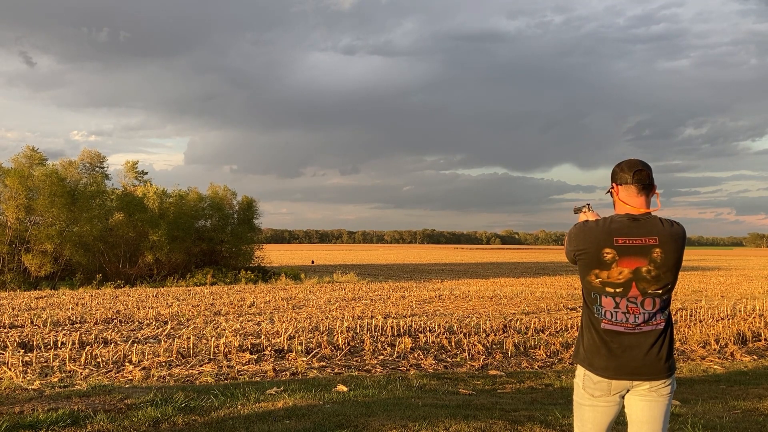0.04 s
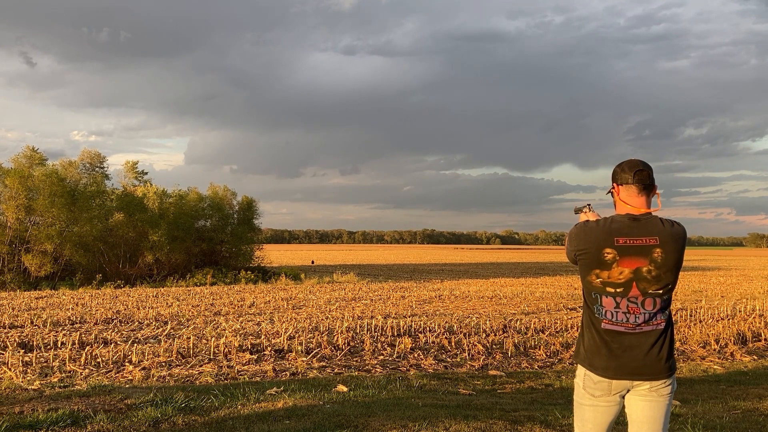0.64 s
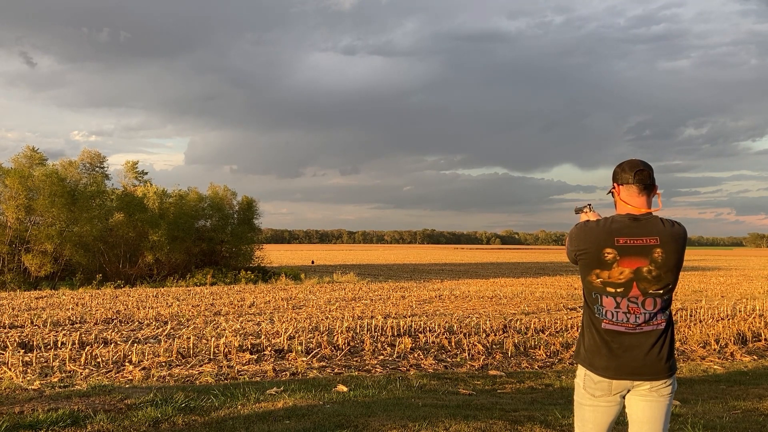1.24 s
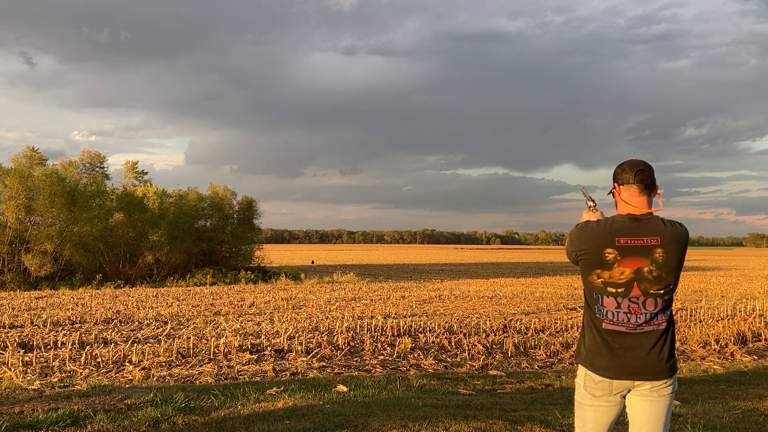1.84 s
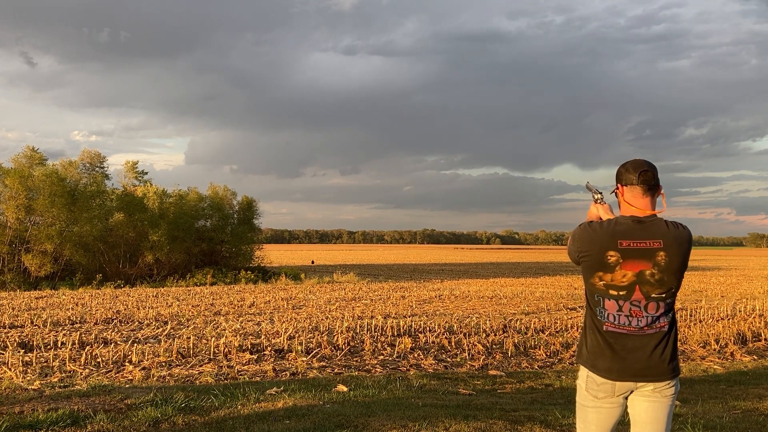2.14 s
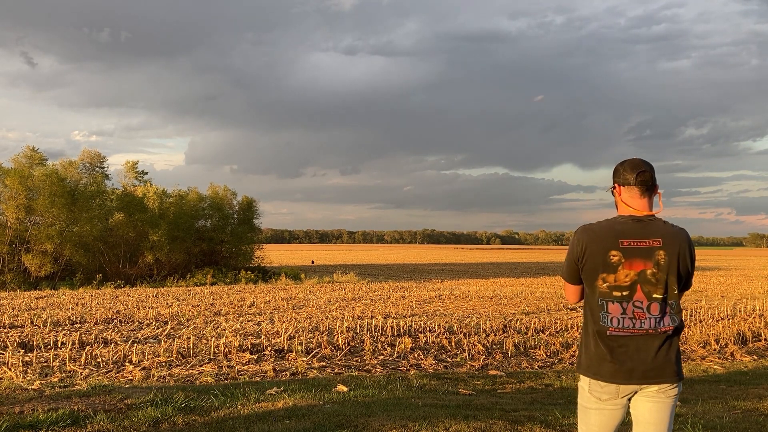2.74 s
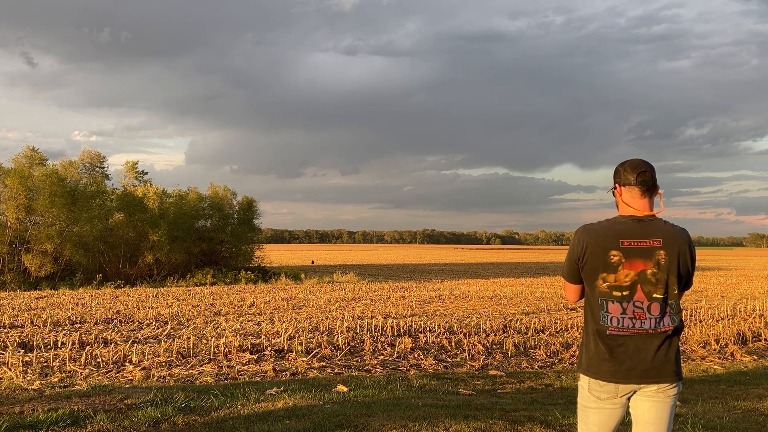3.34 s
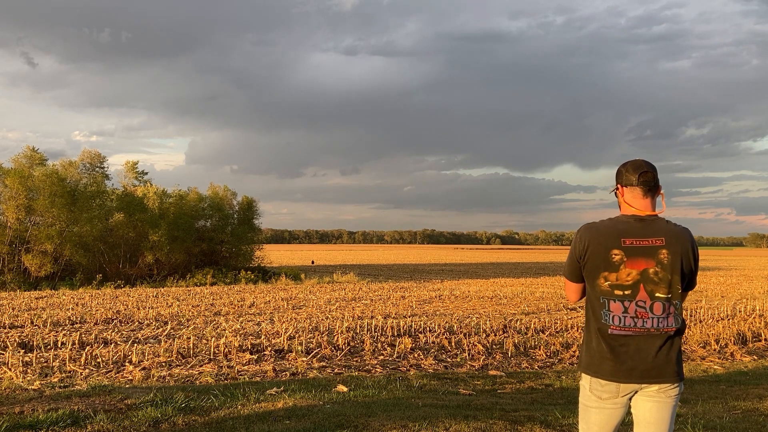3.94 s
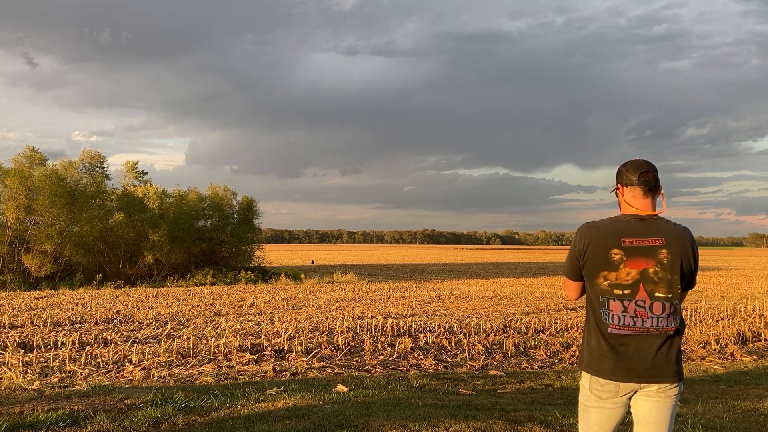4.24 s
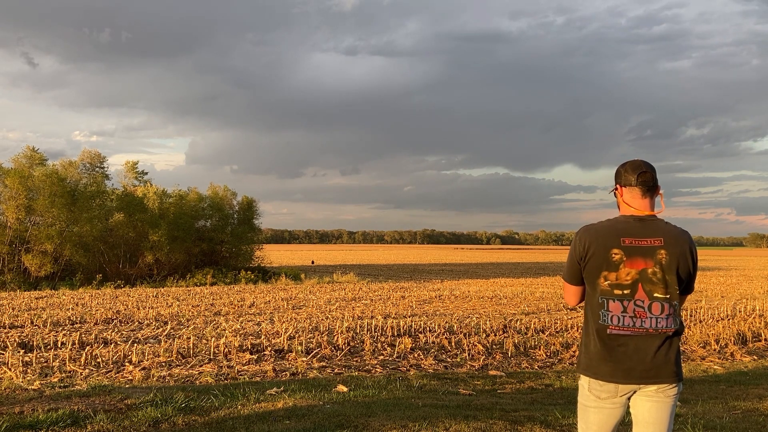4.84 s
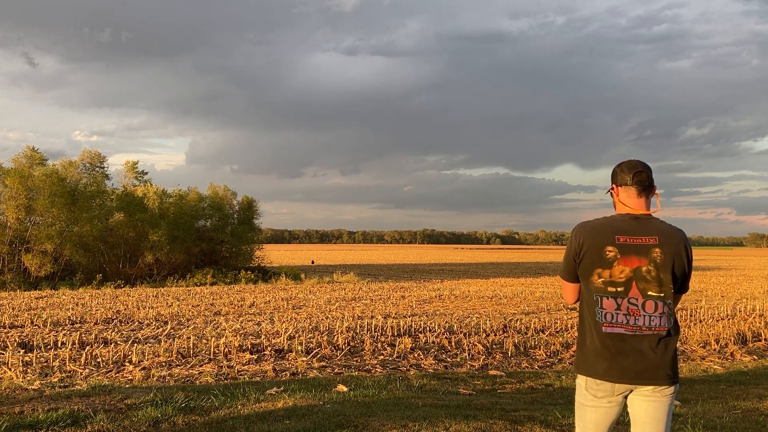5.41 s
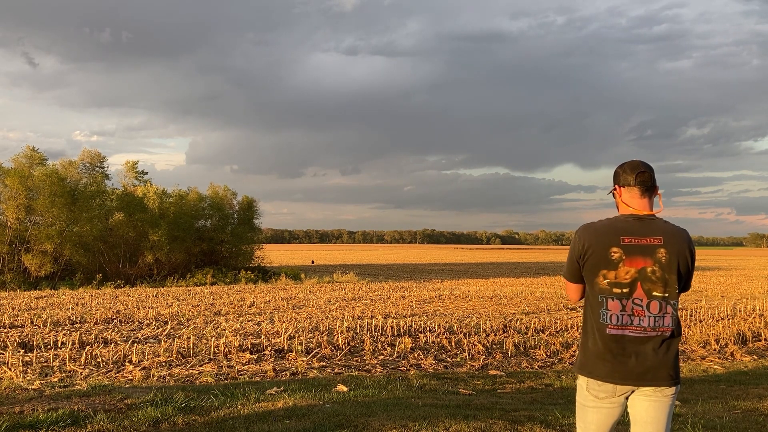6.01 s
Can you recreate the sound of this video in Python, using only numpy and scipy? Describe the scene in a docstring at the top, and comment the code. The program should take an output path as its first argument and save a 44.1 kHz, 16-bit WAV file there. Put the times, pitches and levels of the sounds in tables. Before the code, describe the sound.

A revolver fires once, close to the microphone, over a soft bed of chirping crickets in a wide field. The distorted bang rolls off the trees, and a bright metallic clang comes back from a far steel target less than a second later. As the ring dies away, faint insects remain, with one light click of the gun being handled and slight wind rumble near the end.

```python
"""Crickets and a katydid rub their wings in a harvested field while a far vehicle hums past.
At 1.8 s, just after a brief, harsh swell of recording noise, a revolver fires and overloads the
microphone. Nearby trees throw back sharp claps, then the far tree line dull ones. At 2.6 s comes
the clang of the bullet on a distant steel plate. At 4.6 s the gun clicks as it is handled.
Last, a little wind bumps the microphone and the insects grow slightly louder."""
import sys
import numpy as np
from scipy import signal
from scipy.fft import rfft, irfft, next_fast_len
from scipy.io import wavfile

SR = 44100
rng = np.random.default_rng(int(sys.argv[2]) if len(sys.argv) > 2 else 0)


def transcribe(u):
    """Save the signal u as a 16-bit wav file named by the first command-line argument.

    u: samples, shape (n,) or (channels, n), limited to [-1, 1]; the rate is SR.
    q: integer samples, one column per channel.
    """
    v = np.clip(np.atleast_2d(u).T, -1, 1)
    q = np.round(v * 32767).astype(np.int16)
    wavfile.write(sys.argv[1], SR, q)


N = 267687

# Hush of the open air: frequency_hz, level_db
AIR_SPECTRUM = [(20, -5.5), (70, -0.5), (130, -7.5), (280, -18), (560, -14.5), (700, -18.5), (1000, -24),
                (1500, -27), (2000, -22), (4000, -45)]
# Small gusts that thud on the microphone: time_s, level_db
GUSTS = [(1.543, -49.5), (5.025, -49.5), (5.079, -45.5), (5.345, -40.5), (5.514, -44)]
# Longer spells of breeze: start_s, rise_s, hold_s, level_db
BREEZES = [(1.45, .3, .05, -61.5), (4.98, 0.11, 0.51, -57)]
# Many far insects blurred together: frequency_hz, level_db
CHORUS_SPECTRUM = [(2000, -33.5), (2800, -20), (3500, -7), (4200, -4.5), (4700, 3), (5300, -3), (5800, -9),
                   (7800, -9), (9000, -15.5), (11500, -13), (15500, -16)]
# Insects that trill without a break: pitch_hz, strokes_per_s, pitch_fall_share, level_vs_chorus_db
TRILLS = [(7390, 25.5, .025, -13), (4590, 44.3, .01, -12), (4215, 79, .02, -12.5)]
# The katydid's high buzz: frequency_hz, level_db
KATYDID_SPECTRUM = [(5000, -42.5), (8000, -15.5), (10200, -4), (11200, -3), (12200, -3), (13500, -14),
                    (15500, -14)]
# Runs of cricket chirps: start_s, end_s, period_s, pitch_hz, level_vs_chorus_db
CHIRP_RUNS = [(.125, 1.5, .39, 4786, -3.5), (.512, 1.7, 0.47, 4150, -9.5), (3.215, 6, .425, 4800, -4),
              (3.93, 6, 0.54, 4130, -8)]
# Steel parts of the gun clicking: start_s, level_db, pitch_hz, width_hz
GUN_CLICKS = [(4.5973, -46, 2600, 700), (4.6014, -49, 1490, 200), (4.6012, -34, 7300, 1200)]
# The plate's strong ringing tones: pitch_hz, level_db, fade_s (a fade is the time to drop 60 dB)
PLATE_TONES = [(467.5, -56.0, 3.0), (898.0, -40.0, 0.55), (1185.3, -34.0, 0.98), (1396.6, -21.5, 0.5),
               (1486.7, -25.0, 0.98), (1902.4, -35.5, 0.5), (2261.0, -40.0, 0.45), (2482.0, -32.5, 0.44),
               (2880.0, -43.0, 0.45), (3308.5, -35.5, 0.46), (3488.0, -45.0, 0.5), (4060.0, -45.0, 0.95),
               (4544.0, -44.0, 0.6), (6282.0, -38.0, 0.45), (6852.2, -33.0, 0.64), (7693.0, -44.0, 0.46),
               (7940.0, -45.0, 0.5), (8753.0, -37.0, 0.33), (10960.0, -42.0, 0.35)]
# Strength of the plate's many weak tones: frequency_hz, level_db
WEAK_TONE_SPECTRUM = [(700, -12), (1500, -1.5), (4000, -2.5), (5600, -12), (8000, -9), (11000, -9.5),
                      (13500, -32)]
# How much of the clang the near trees send back: frequency_hz, gain_db
CLANG_ECHO_GAINS = [(1500, -32), (1900, -3), (2450, -16), (3350, -13), (4050, -6), (6900, -13), (9000, -16)]
# Land that scatters the shot (stubble, near trees, tree line, farther trees):
# start_s, hold_s, fade_s, bright_db, dull_db
LAND_PATCHES = [(1.808, 0.022, 0.13, -24, -34), (1.946, 0.17, 0.38, -36.5, -44.5),
                (2.165, 0.052, 0.79, -40, -35.5), (2.412, 0.054, 0.2, -51, -39.5)]
# The bright part of that scattered sound: frequency_hz, level_db
BRIGHT_SPECTRUM = [(60, -9), (200, -4.5), (430, -11), (1000, 5), (1600, -2.5), (3300, -6.5), (5000, -12),
                   (8000, -17.5), (14000, -31)]
# The dull part of that scattered sound: frequency_hz, level_db
DULL_SPECTRUM = [(60, -23), (200, -20), (380, -7), (900, -2), (1800, -7.5), (8000, -45.5)]
# The shot's thump, returned softly by the near trees: time_s, level_db
ECHO_THUDS = [(2.033, -35), (2.112, -36)]
# Sharp echoes off the near trees: start_s, level_db, low_hz, high_hz
NEAR_ECHOES = [(1.8404, -12.5, 1300, 3230), (1.9686, -12, 550, 5730), (1.9718, -17, 600, 2590),
               (2.0122, -14.5, 1000, 4470), (2.0367, -12, 1590, 3870), (2.0708, -20.5, 2200, 7940),
               (2.0925, -11, 1500, 4500), (2.1125, -18, 900, 3400), (2.159, -23.5, 900, 3200)]
# Dull echoes off the far trees: start_s, level_db, centre_hz, crisp_edge_db
FAR_ECHOES = [(2.1827, -21, 795, -9), (2.1948, -21, 900, -16), (2.202, -16.5, 840, -11),
              (2.2355, -17.5, 740, -14), (2.2476, -22, 680, -22), (2.2546, -20.5, 880, -16),
              (2.2653, -19.5, 820, -16), (2.268, -19.5, 810, -22), (2.316, -23.5, 850, -20),
              (2.363, -25, 630, -21), (2.403, -27, 680, -26), (2.4342, -23, 490, -26),
              (2.4673, -21, 704, -22), (2.478, -21.5, 576, -24), (2.5592, -33.5, 750, -8),
              (3.144, -39, 780, 0.5), (3.697, -58, 700, -14)]
# The swell of recording noise just before the shot: frequency_hz, level_db
RECORDING_NOISE_SPECTRUM = [(60, -5.5), (200, 0.5), (600, -8.5), (1500, -14), (3500, -20), (6400, -25),
                            (7600, -20), (8500, -32), (16000, -42)]
# Harsh tones ringing in that noise: pitch_hz, level_db
RECORDING_NOISE_TONES = [(683, 0), (797, -3), (966, -1), (1144, -5), (1290, -2), (1818, -11), (2058, -11),
                         (2705, -13), (7155, -15), (7501, -14)]
# Which side that noise leans to: frequency_hz, left_minus_right_db
RECORDING_NOISE_PAN = [(380, 6), (700, -13.5), (1290, -23), (2400, -5.5), (8000, -2.5)]

TIME = np.arange(N) / SR
SHOT_S, CLANG_S = 1.8135, 2.569
CHORUS_DB = -64.5
FIELD_LAG_MS = -.272   # sound from the field reaches the left side slightly first


def amp(db):
    """Turn decibels into a number to multiply by."""
    return np.exp(np.maximum(db, -300) * (np.log(10) / 20))


def unit_power(x):
    """Scale a sound so that its average power is one."""
    return x / np.sqrt(np.mean(x ** 2) + 1e-20)


def spectrum(points):
    """Join (frequency, dB) points into a curve with a value for every FFT frequency."""
    hz, db = np.transpose(points)
    return np.interp(np.log(np.fft.rfftfreq(N, 1 / SR) + 1), np.log(hz), db)


def equalise(x, gains_db):
    """Turn each frequency up or down by its own amount."""
    size = next_fast_len(N, True)
    gains = np.interp(np.fft.rfftfreq(size), np.fft.rfftfreq(N), amp(gains_db))
    return irfft(rfft(x, size) * gains, size)[..., :N]


def band(x, low_hz, high_hz, order=2):
    """Keep the frequencies between two limits."""
    limits = [low_hz, min(high_hz, .45 * SR)]
    return signal.sosfilt(signal.butter(order, limits, "band", fs=SR, output="sos"), x)


def place(x, pan_db, lag_ms):
    """Make stereo: the left side is louder by pan_db and later by lag_ms."""
    t = np.arange(len(x)) / SR
    left = np.interp(t - lag_ms / 1000, t, x)
    return np.array([left * amp(pan_db / 2), x * amp(-pan_db / 2)])


def noise(points, alike=0., lag_ms=0.):
    """Stereo noise with a given spectrum; alike (0 to 1) is the share both sides have in common."""
    shared, *own = rng.standard_normal((3, N))
    white = np.sqrt(alike) * place(shared, 0, lag_ms) + np.sqrt(1 - alike) * np.array(own)
    return unit_power(equalise(white, spectrum(points)))


def drift(rate_hz, size=N):
    """A smooth random wobble, about one in size."""
    smooth = signal.butter(2, rate_hz, fs=SR, output="sos")
    return unit_power(signal.sosfilt(smooth, rng.standard_normal(size + SR // 4))[-size:])


def tone(hz, waver):
    """A pure tone whose pitch wanders by a small share."""
    return unit_power(np.sin(2 * np.pi * np.cumsum(hz * (1 + waver * drift(25))) / SR))


def dying(start_s, fade_s):
    """A loudness curve that jumps to one and dies away."""
    return (TIME >= start_s) * amp(-60 * np.maximum(TIME - start_s, 0) / fade_s)


def swell(start_s, rise_s, hold_s, fade_s):
    """A loudness curve that grows to one, holds and dies away."""
    rise = np.clip((TIME - start_s) / rise_s, 0, 1) ** 2
    return rise * amp(-60 * np.maximum(TIME - start_s - rise_s - hold_s, 0) / fade_s)


def bumps(rows, half_width_s):
    """A loudness curve with one short hump for each (time, dB) row."""
    return sum(amp(db) * np.exp(-.5 * ((TIME - s) / half_width_s) ** 2) for s, db in rows)


def clap(low_hz, high_hz, tail, fade_s, order=3):
    """A pressure spike with a noisy tail, kept to one band and scaled to a peak of one."""
    t = np.arange(SR // 16) / SR
    spike = tail * rng.standard_normal(len(t)) * amp(-60 * t / fade_s)
    spike[0] += 1
    x = band(spike, low_hz, high_hz, order)
    return x / np.abs(x).max()


def add(out, start_s, x):
    """Mix a sound in at a given time."""
    at = int(start_s * SR)
    out[..., at:at + x.shape[-1]] += x[..., :N - at]


def far_vehicle(level_db=-80.5, nearest_s=.65, fade_db_per_s=15):
    """Far tyres hum, loudest as the vehicle passes."""
    return amp(level_db - fade_db_per_s * np.abs(TIME - nearest_s)) * tone(567, waver=.0061)


def open_air():
    """A low hush, plus a higher one that sounds wide because its two sides are opposite."""
    wide = noise([(250, -25), (550, .5), (1000, -2.5), (2600, -12.5), (5000, -35)], alike=1) * [[1], [-1]]
    return amp(-70) * noise(AIR_SPECTRUM, alike=.54, lag_ms=FIELD_LAG_MS) + amp(-76.5) * wide


def wind():
    """Breeze and small gusts push on the microphone and make it rumble."""
    breeze = sum(amp(db) * swell(s, rise_s, hold_s, fade_s=.4) for s, rise_s, hold_s, db in BREEZES)
    rumble = noise([(20, .5), (55, 1.5), (100, -3), (170, -19.5), (300, -40.5), (4000, -90)], alike=.41)
    return (bumps(GUSTS, half_width_s=.015) + breeze) * rumble


def wing_strokes(strokes, hz, fall, rasp):
    """Each closing of the wings is a short tone that sags in pitch; strokes counts up over time."""
    progress = strokes % 1
    note = np.exp(2j * np.pi * np.cumsum(hz * (1 - fall * (progress - .5))) / SR)
    roughness = drift(170, len(strokes)) + 1j * drift(170, len(strokes))
    return unit_power(np.sin(np.pi * progress) ** 4 * np.real(note * (1 + rasp * roughness)))


def insect_chorus(join_s=5.07, join_rise_s=.71, lisp_period_s=.36):
    """A blur of far insects, steady trills and a slow lisping call; more insects join near the end."""
    lift = amp(3 * np.clip((TIME - join_s) / join_rise_s, 0, 1))
    out = np.sqrt(lift) * noise(CHORUS_SPECTRUM, alike=.39, lag_ms=FIELD_LAG_MS)
    for hz, strokes_per_s, fall, db in TRILLS:
        trill = wing_strokes(strokes_per_s * TIME, hz, fall, rasp=.4)
        out += lift * amp(db) * place(trill, pan_db=-.5, lag_ms=rng.uniform(-.0303, .03))
    lisp_pulses = np.cos(np.pi * (TIME - 3.63) / lisp_period_s) ** 4
    out += amp(-10) * lisp_pulses * unit_power(band(rng.standard_normal(N), 8000, 8550))
    return amp(CHORUS_DB) * out


def katydid(level_db=-59, buzz_hz=74, stop_s=2.2):
    """A high, fast-pulsing hiss that falls silent soon after the shot."""
    buzz = unit_power(1 + .6 * np.sin(2 * np.pi * buzz_hz * TIME))
    loudness = amp(level_db) * ((TIME < stop_s) + dying(stop_s, fade_s=.29))
    return loudness * buzz * noise(KATYDID_SPECTRUM, alike=1, lag_ms=FIELD_LAG_MS)


def crickets(stroke_s=.042):
    """Two nearer crickets chirp evenly, two or three wing strokes a time, with one long pause."""
    out = np.zeros((2, N))
    for start_s, end_s, period_s, hz, db in CHIRP_RUNS:
        for s in np.arange(start_s, end_s, period_s):
            strokes = np.arange(int(rng.choice([2, 3, 3]) * stroke_s * SR)) / (stroke_s * SR)
            add(out, s - .012, amp(CHORUS_DB + db) * wing_strokes(strokes, hz, fall=.13, rasp=.3))
    return out


def gun_handling():
    """The revolver's steel parts click and ring briefly; the trees answer softly."""
    out = np.zeros((2, N))
    for s, db, hz, width_hz in GUN_CLICKS:
        add(out, s, amp(db) * clap(hz - width_hz / 2, hz + width_hz / 2, tail=.65, fade_s=.013, order=1))
    answer = unit_power(band(rng.standard_normal((2, N)), 420, 1070))
    out += amp(-75) * swell(4.65, .095, .11, fade_s=.3) * answer
    hiss = noise([(400, 2), (1500, -4), (15000, -7)])
    return out + amp(-57.5) * dying(GUN_CLICKS[0][0], fade_s=.45) * hiss


def weak_plate_tones(count=260, spread_db=14, typical_fade_s=.42):
    """The struck plate has a crowd of weak tones, each with its own strength and quick fade."""
    age, crowd = np.arange(SR * 3 // 4) / SR, 0
    for k, (offset, strength, life, flip) in enumerate(rng.random((count, 4))):
        hz = 700 + 13800 * ((k + offset) / count) ** 1.3
        db = np.interp(hz, *np.transpose(WEAK_TONE_SPECTRUM)) + spread_db * strength
        loudness = amp(db - 60 * age / (typical_fade_s * (.5 + life)))
        crowd += np.sign(flip - .5) * loudness * np.sin(2 * np.pi * hz * age)
    return crowd / np.std(crowd[:SR // 100])


def clang_echoes(ring, near_delay_s=.125, far_delay_s=.77, rise_s=.05):
    """The near trees send the ring back, so some tones swell again; the tree line answers later."""
    near, far = np.zeros(N), np.zeros((2, N))
    echo = ring * np.minimum(TIME[:len(ring)] / rise_s, 1)
    add(near, CLANG_S + near_delay_s, echo)
    add(far, CLANG_S + far_delay_s, place(band(echo, 1080, 1300), pan_db=1, lag_ms=FIELD_LAG_MS))
    return equalise(near, spectrum(CLANG_ECHO_GAINS)) + amp(-30) * far


def steel_plate(spread_s=.0056):
    """The bullet cracks on the steel; the weak tones die fast and a few strong ones sing on."""
    out, age = np.zeros((2, N)), np.arange(2 * SR) / SR
    strong = amp(-.5) * sum((-1) ** k * amp(db - 60 * age / fade_s) * np.sin(2 * np.pi * hz * age)
                            for k, (hz, db, fade_s) in enumerate(PLATE_TONES))
    clang = strong.copy()
    add(clang, 0, amp(-33) * weak_plate_tones())
    clang *= 1 - np.exp(-age / spread_s)   # the ring takes a moment to spread over the plate
    add(clang, 0, amp(-16) * clap(7800, 10500, tail=.1, fade_s=.035))   # thin snap
    add(clang, 0, amp(-3.5) * clap(1670, 4700, tail=.06, fade_s=.035))   # main crack
    add(out, CLANG_S, place(clang, pan_db=.5, lag_ms=-.08))
    field_scatter = noise([(400, -3), (1400, -5), (3500, 5), (14000, -23)], alike=.4, lag_ms=-.042)
    out += amp(-47) * dying(CLANG_S, fade_s=1) * field_scatter
    clank = unit_power(band(rng.standard_normal(N), 520, 1700))
    out += amp(-42) * dying(CLANG_S, fade_s=.38) * clank
    cut_bass = signal.butter(2, 270, "high", fs=SR, output="sos")   # a small plate gives off no bass
    return signal.sosfilt(cut_bass, out + clang_echoes(strong))


def field_roll(rise_s=.012):
    """Each patch of land returns the shot as an uneven wash, over the dying roll of the whole field."""
    bright_power = (amp(-33.5) * dying(SHOT_S, fade_s=1.5)) ** 2
    dull_power = (amp(-44) * dying(SHOT_S, fade_s=2.88)) ** 2
    for s, hold_s, fade_s, bright_db, dull_db in LAND_PATCHES:
        wash = swell(s, rise_s, hold_s, fade_s)
        bright_power += (amp(bright_db) * wash) ** 2
        dull_power += (amp(dull_db) * wash) ** 2
    bright = amp(1.5 * drift(250)) * noise(BRIGHT_SPECTRUM, alike=.62, lag_ms=.5) * amp([[-1.4], [1.4]])
    dull = amp(3.5 * drift(130)) * noise(DULL_SPECTRUM, alike=.56, lag_ms=FIELD_LAG_MS)
    return np.sqrt(bright_power) * bright + np.sqrt(dull_power) * dull


def bass_echoes():
    """The near trees return the shot's bass as a long rumble and two soft thuds."""
    loudness = amp(-44) * swell(1.93, .08, .076, fade_s=.2) + amp(-46.5) * dying(SHOT_S, fade_s=4.2)
    rumble = noise([(20, 2), (55, 1.5), (100, -5), (170, -13), (2000, -90)], alike=.9)
    thud = noise([(120, 0), (230, -5.5), (1500, -80)], alike=.92)
    return loudness * rumble + bumps(ECHO_THUDS, half_width_s=.011) * thud


def stubble_and_leaves():
    """Cut stalks close by answer the shot at once with a puff and a hiss; far leaves hiss back later."""
    stubble = noise([(350, 12), (700, -5), (4000, -10.5), (7000, 0), (15500, -4)], alike=.9)
    leaves = noise([(2500, -20), (4500, -3), (7500, -2.5), (12000, -12), (15000, -33)], alike=.4)
    return (amp(-32) * dying(SHOT_S, fade_s=.4) * stubble
            + amp(-45) * swell(2.13, .044, .038, fade_s=.53) * leaves)


def tree_echoes():
    """Single trees throw the shot back, near ones sharp and far ones dull, with a thin whistle."""
    out = np.zeros((2, N))
    for s, db, low_hz, high_hz in NEAR_ECHOES:
        sharp = clap(low_hz, high_hz, tail=.35, fade_s=.013)
        add(out, s, amp(db) * place(sharp, pan_db=-2.5, lag_ms=.36))
    for s, db, hz, edge_db in FAR_ECHOES:
        dull = clap(hz * .69, hz * 1.36, tail=.073, fade_s=.025)
        edge = amp(edge_db) * clap(1300, 3000, tail=.056, fade_s=.0088, order=4)
        add(out, s, amp(db) * place(dull + edge, pan_db=2, lag_ms=FIELD_LAG_MS))
    whistle = amp(-43) * swell(2.055, .008, .065, fade_s=.03) * tone(5760, waver=.0082)
    return out + whistle


def recording_noise():
    """A harsh, ringing swell of recording noise just before the shot."""
    tones = unit_power(sum(amp(db) * np.sin(2 * np.pi * (hz * TIME + rng.random()))
                           for hz, db in RECORDING_NOISE_TONES))
    left, right = amp(-4) * noise(RECORDING_NOISE_SPECTRUM) + amp(-2) * tones
    pan_db = spectrum(RECORDING_NOISE_PAN)
    panned = np.array([equalise(left, np.minimum(pan_db, 0)), equalise(right, np.minimum(-pan_db, 0))])
    return amp(-4.5) * swell(1.7805, .0225, .0095, fade_s=.014) * unit_power(panned)


def revolver_shot(thump_cycles=2.25, slowing_s=.0063):
    """A sharp crack, then a thump of air that slows into a lingering suction."""
    crack = noise([(300, -3), (900, 13), (2500, 0), (7500, -5), (10500, 7), (13500, -5)])
    crack *= amp(.5) * dying(SHOT_S - .001, fade_s=.01)
    age = np.maximum(TIME - SHOT_S - .0004, 0)
    pressure = -np.sin(2 * np.pi * thump_cycles * np.tanh(age / slowing_s))   # settles below zero
    thump = pressure * (amp(5) * dying(SHOT_S, fade_s=.056) + amp(-17.5) * dying(SHOT_S, fade_s=.21))
    return crack + place(thump, pan_db=2, lag_ms=.6)


def widen_treble(x, above_hz=6300, in_step_hz=7200, full_turn_hz=4150):
    """In the treble, the left side becomes a phase-shifted copy of the right, which sounds wide."""
    size = next_fast_len(N, True)
    left, right = rfft(x, size)
    hz = np.fft.rfftfreq(size, 1 / SR)
    share = np.clip((hz - above_hz) / 400 + .5, 0, 1)
    shifted = right * np.exp(-2j * np.pi * (hz - in_step_hz) / full_turn_hz)
    return irfft(np.array([(1 - share) * left + share * shifted, right]), size)[:, :N]


def scene():
    """The shot, its echoes and the plate, over the insects and air of the field."""
    return (recording_noise() + revolver_shot() + field_roll() + bass_echoes() + stubble_and_leaves()
            + tree_echoes() + steel_plate() + insect_chorus() + katydid() + crickets()
            + far_vehicle() + open_air() + wind() + gun_handling())


def record(dry, boost_db=11.5, no_boost_at_db=-26):
    """Automatic volume lifts the quiet field until a loud peak turns it down for good; the shot clips."""
    loudest_so_far_db = 20 * np.log10(np.maximum.accumulate(np.abs(dry).max(axis=0)) + 1e-9)
    gain = amp(np.clip(no_boost_at_db - loudest_so_far_db, 0, boost_db))
    clipped = np.clip(gain * widen_treble(dry), -.97, .97)
    cut_top_treble = signal.cheby2(14, 60, 16500, fs=SR, output="sos")
    return signal.sosfilt(cut_top_treble, clipped)


dry = scene()
out = record(dry)
transcribe(out)
```